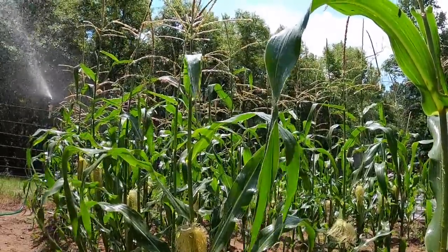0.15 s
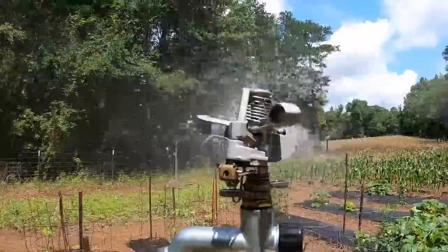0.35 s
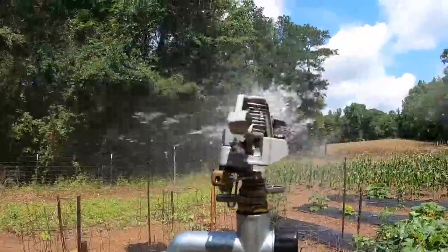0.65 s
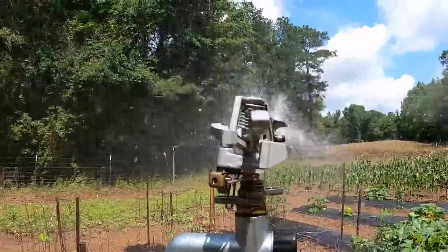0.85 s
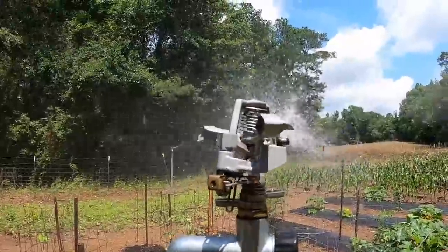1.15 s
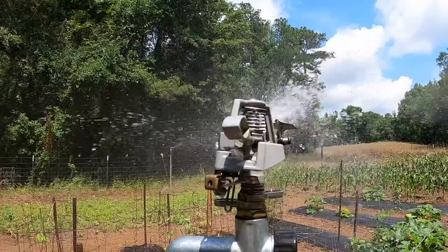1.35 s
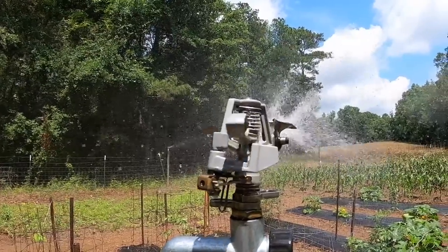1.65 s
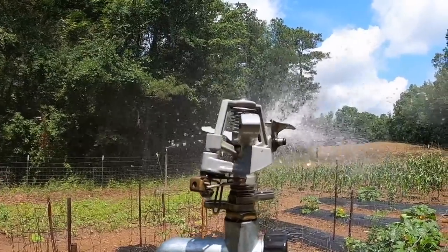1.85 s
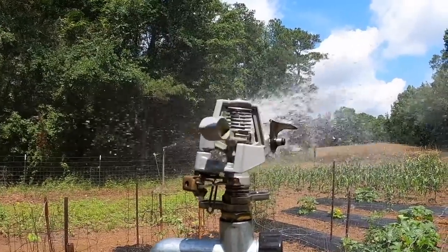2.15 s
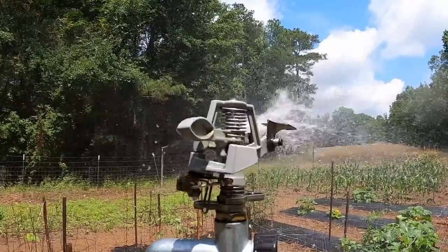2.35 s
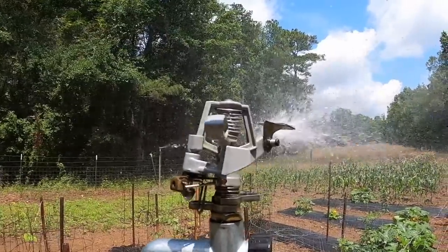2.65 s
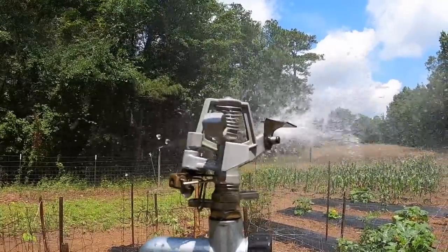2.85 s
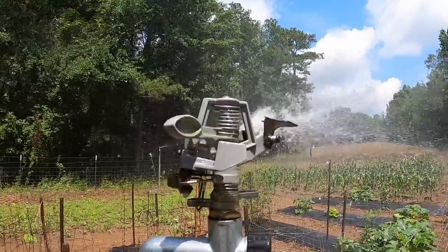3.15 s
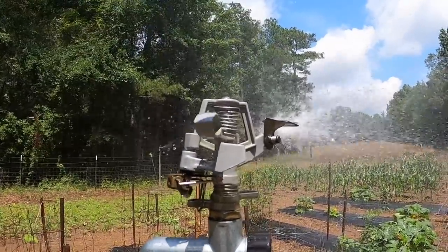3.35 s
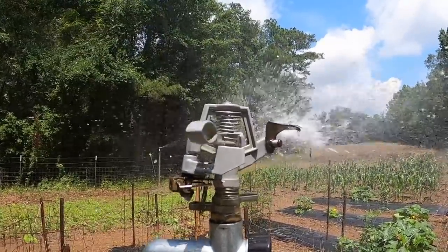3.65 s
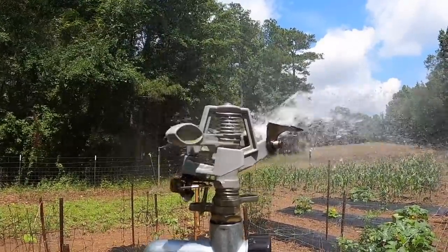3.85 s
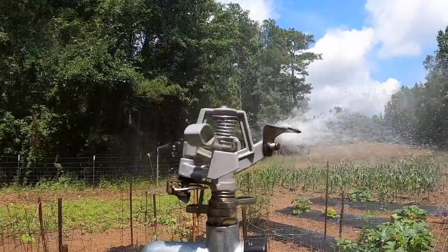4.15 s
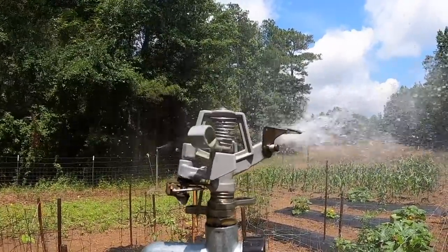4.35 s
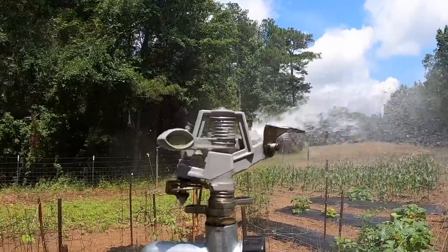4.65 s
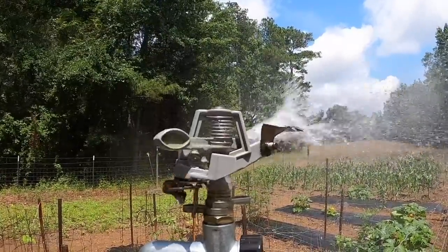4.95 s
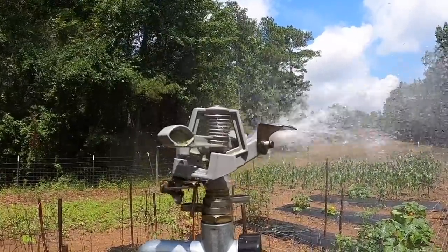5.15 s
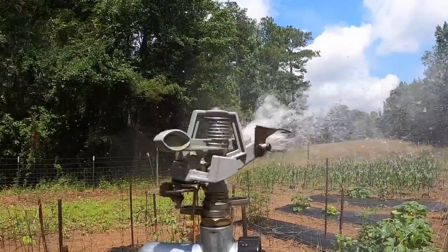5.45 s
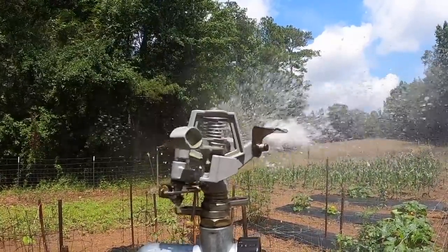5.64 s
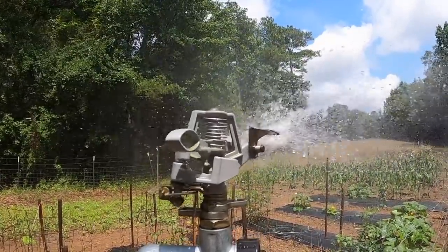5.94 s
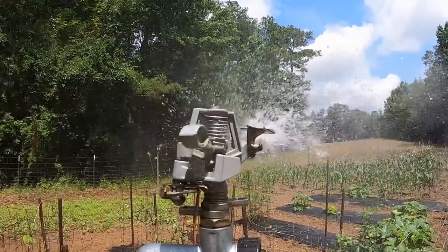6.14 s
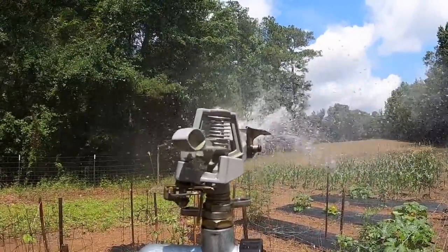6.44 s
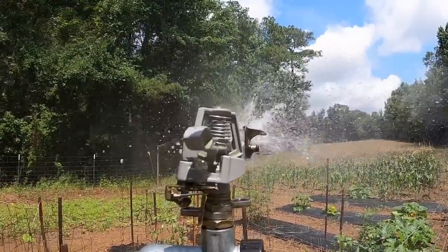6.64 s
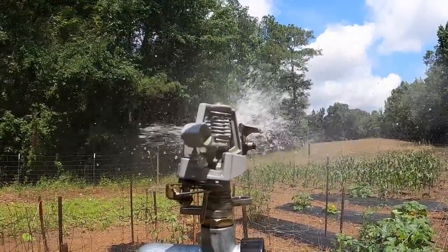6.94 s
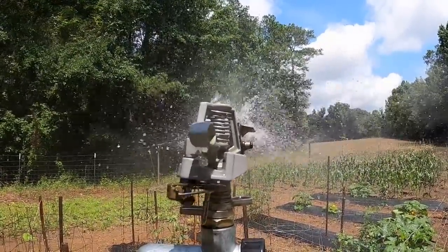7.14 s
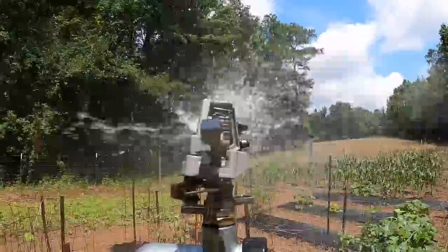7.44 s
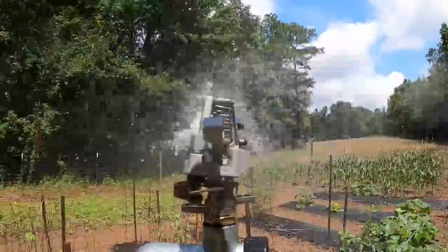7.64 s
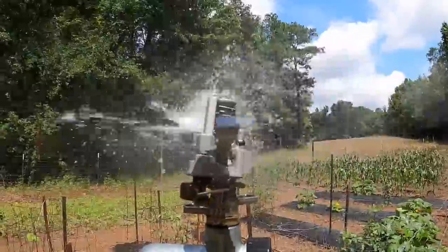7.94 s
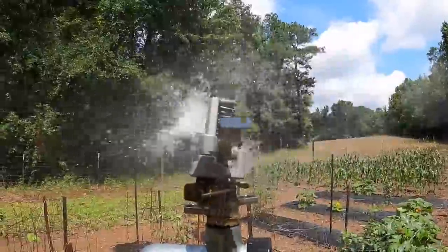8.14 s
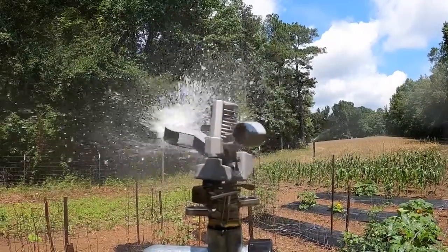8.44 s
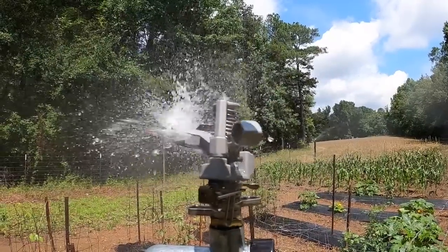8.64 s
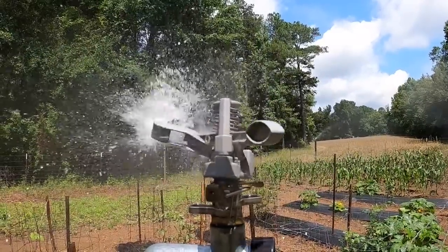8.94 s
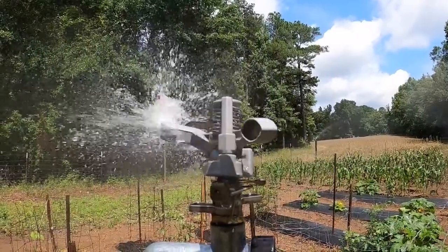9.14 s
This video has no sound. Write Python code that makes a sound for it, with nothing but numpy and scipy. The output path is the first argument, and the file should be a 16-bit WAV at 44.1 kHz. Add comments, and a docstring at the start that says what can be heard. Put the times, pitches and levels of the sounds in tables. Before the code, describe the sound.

From 0 to 0.25 s there is only a quiet, distant wash of falling water, low rumble and insect buzz. At about 0.26 s it cuts to a large impact sprinkler, very near. Its metal arm strikes evenly, almost nine times a second, each blow a crisp, high, short-ringing clink with a burst of torn water, fine spray and a faint low pipe thud. Between blows the jet hisses brightly and spits drops, thinning briefly as each stroke blocks it. The metallic body of the knocks grows fuller toward 3 to 5 s. At about 5 s the rhythm jumps to a fluttering fourteen strokes a second: louder, denser wet chops, with clinks far weaker. From 7 s onward the chatter stays rapid, gradually losing metal and finest spray, more splash-dominated by 9.3 s. Insects and falling water remain underneath. Dry open air, centred, close microphone.

```python
"""Garden: a large impact sprinkler, far off at first, close from its first swing at 0.26 s.
Jet, falling water, rumble and insects in the trees are spectrally shaped noise; the jet also spits drops.
The sprung arm swings its spoon into the jet: noise and drops splash, the pipe thuds, struck modes ring.
After 5 s the arm flutters faster and its high clink is weaker. All is centred but a faint low flicker."""
import sys
import numpy as np
from scipy import signal
from scipy.fft import rfft, irfft, next_fast_len
from scipy.io import wavfile
from scipy.ndimage import uniform_filter1d, map_coordinates

SR = 44100
rng = np.random.default_rng(int(sys.argv[2]) if len(sys.argv) > 2 else 0)


def store_wav(level_fs):
    """Save 16-bit WAV to argv[1]."""
    pcm = np.round(np.clip(np.atleast_2d(level_fs), -1, 1) * 32767)
    wavfile.write(sys.argv[1], SR, pcm.T.astype(np.int16))


N = 409688

# steady sounds: t/s, gain/dB of rumble, falling water, insects, jet; jet treble over the rest/dB
STEADY_GAINS = [(0, -30, -32.5, -35, -41, -8), (.26, -34.5, -35.5, -35.5, -44, -11),
                (.28, -35.5, -38, -36, -28.5, 3), (1.4, -37, -39, -39, -31, 0),
                (1.8, -36.5, -36.5, -37, -29, -1), (4.7, -38.5, -37.5, -34.5, -28, -2),
                (5.3, -37, -33.5, -28.5, -23.5, -1), (6.7, -35.5, -33, -31, -24.5, -3),
                (7, -36.5, -34.5, -31.5, -25.5, -1), (9.29, -33.5, -32.5, -28.5, -26, -4)]
# noise colours: f/Hz, density/dB per Hz
RUMBLE_SPECTRUM = [(12, -34), (20, -5), (75, -1.5), (116, -2.5), (228, -13.5), (400, -26), (520, -47),
                   (880, -120)]
FALL_SPECTRUM = [(150, -20), (250, -2.5), (600, -3), (720, -3), (790, -0.5), (860, -3.5), (1500, -3),
                 (3000, -3), (4600, -5.5), (6200, -16.5)]
INSECT_SPECTRUM = [(2600, -25.5), (3300, -3), (3900, -3.5), (5000, -8.5), (5400, -11.5)]
JET_SPECTRUM = [(3000, -37), (5500, -14.5), (7000, -10.5), (8500, -3), (11000, -1.5), (14000, 2),
                (16500, -1)]
FLICKER_SPECTRUM = [(15, -30), (40, -9), (150, -6), (400, -9), (900, -13), (1500, -26), (2500, -43)]
SPLASH_SPECTRUM = [(700, -21.5), (1500, -14), (2500, -9.5), (3500, -5), (5000, -0.5), (7000, 0.5),
                   (8500, 0.5), (10000, -3), (13000, -23)]
SPRAY_SPECTRUM = [(6000, -28), (8500, -4.5), (10000, -0.5), (12000, 0), (14000, -7.5), (16500, -5)]
SLAP_SPECTRUM = [(200, -22), (500, -7), (1500, 1.5), (3000, 1.5), (5000, -26)]
# swings of the arm into the jet: blow t/s, splash gain/dB, clink of the two highest mode groups/dB
SWINGS = [(0.2625, -22.5, -19), (0.3785, -19.5, -14), (0.4937, -22.5, -10.0), (0.6061, -21, -15),
          (0.719, -24.5, -10.6), (0.8352, -23.5, -10.7), (0.9507, -22.5, -14.7), (1.0635, -23, -11.5),
          (1.179, -23, -10.4), (1.293, -24.4, -12), (1.409, -23.4, -12.2), (1.5225, -22.5, -14.4),
          (1.6356, -21, -11.8), (1.748, -21, -13.5), (1.8638, -21, -12.8), (1.9769, -22, -12),
          (2.0891, -23.0, -11), (2.2029, -23.5, -12.6), (2.3168, -23, -13), (2.4276, -21.5, -17),
          (2.5433, -22, -12.4), (2.6546, -23, -11.2), (2.7698, -20, -20), (2.8856, -21.5, -12),
          (3.0025, -23.5, -13), (3.1177, -23, -14.2), (3.2332, -24.5, -12), (3.3487, -21.5, -13.3),
          (3.4639, -21.5, -14), (3.5795, -23, -12), (3.6958, -23, -13), (3.81, -25, -13),
          (3.9225, -23.5, -17), (4.0351, -22.5, -13.6), (4.1488, -23.5, -14.0), (4.2628, -22.5, -14.6),
          (4.3778, -22, -15), (4.4921, -23.5, -11), (4.6077, -22, -17), (4.7233, -22, -16),
          (4.8377, -23, -15), (4.9537, -22, -17), (5.0333, -21.0, -29.9), (5.1064, -19.5, -31.4),
          (5.1795, -20, -26.7), (5.2486, -19.5, -25.5), (5.3189, -19.5, -19.9), (5.3906, -18.5, -27.8),
          (5.4646, -19.5, -24.3), (5.5349, -19, -21.8), (5.6082, -19, -26.7), (5.679, -17.5, -24.9),
          (5.7521, -18.5, -26.6), (5.8217, -19, -22.5), (5.8894, -19.5, -22.7), (5.9607, -19, -26.8),
          (6.0305, -19.5, -22.4), (6.1016, -19.5, -25.7), (6.1732, -18.5, -25.7), (6.2435, -19.5, -23.4),
          (6.3152, -19, -21.9), (6.3851, -20.5, -24.6), (6.4557, -18.5, -26.3), (6.5234, -18.0, -22.4),
          (6.5917, -18.5, -22.0), (6.6622, -19.5, -21.9), (6.7312, -19.0, -24.3), (6.7998, -18.1, -23.4),
          (6.868, -19.5, -26.5), (6.9389, -18.5, -18.1), (7.0123, -19.5, -23.7), (7.0835, -18.5, -23.9),
          (7.1552, -19.5, -18.2), (7.2222, -19, -26.7), (7.2932, -18.4, -20.3), (7.3622, -18.7, -21.4),
          (7.4324, -18.5, -27.3), (7.5067, -18.0, -24.8), (7.5763, -18.4, -27.7), (7.6484, -19, -24.7),
          (7.7194, -18.5, -24.1), (7.7897, -19, -23.0), (7.8617, -18.5, -26.4), (7.9336, -17.5, -25.9),
          (8.008, -18, -28.2), (8.0786, -18.5, -27.6), (8.1495, -18, -23.4), (8.2197, -19, -24.4),
          (8.2887, -19, -25.2), (8.3571, -17.5, -26.8), (8.4267, -18.5, -28.6), (8.4954, -17.5, -31),
          (8.5687, -18, -29.4), (8.6411, -17.5, -27.9), (8.7117, -17, -29.3), (8.7832, -17.5, -26.0),
          (8.8546, -17.5, -33.3), (8.9236, -18, -30.2), (8.994, -17.5, -30.8), (9.0659, -17, -32.8),
          (9.1374, -18, -32.3), (9.211, -17, -32.5), (9.282, -18, -34)]
# turning head: t/s, fine spray over splash/dB, top mode over the next/dB,
# level/dB of the four lower mode groups, highest first
HEAD_TURN = [(.26, 1, -3, -21, -17, -28, -19), (1.2, -0.5, -7, -20, -20, -21.5, -21),
             (2, -1, -2, -20, -17, -16.5, -19), (3.1, -3, 4, -14.5, -15, -16, -16.5),
             (3.9, -4, 1, -15, -14, -14, -19), (4.97, -2, -2, -15.5, -11.5, -15.5, -18.5),
             (5.01, -4, 4, -31, -33, -29, -38), (6.4, -1, 5, -28, -39, -28, -28),
             (7.4, -0.5, -1, -31, -28, -37, -33), (8.3, -2.5, 1, -33, -30, -40, -35),
             (9.29, -13, 0, -40, -37, -38, -42)]
# splash whistling in the spoon as the nozzle comes round: t/s, band lift/dB
CUP_LIFT = [(0, -1.5), (5, 1), (7, 0.5), (9.29, 3.5)]
# riser pipe modes: f/Hz, level/dB, t60/s
PIPE_MODES = [(72, 0, .085), (120, -3, .04)]
# pipe thud: t/s, level/dB
THUD_LEVEL = [(0, -34), (.5, -42), (2.2, -41), (3.6, -41), (4.6, -45), (5.6, -43), (6.5, -38), (7.5, -41),
              (8, -36.5), (8.6, -39), (9.29, -36)]
# frame and arm modes: f/Hz, level within the group/dB, t60/s
FRAME_MODES = [(784, -24.5, .03), (1302, -17, 0.036), (1733, -13, 0.023), (2680, -8.5, 0.045),
               (3083, -6, 0.052), (3576, -2.5, 0.03), (3924, -4.5, 0.029), (4570, -3.5, 0.019),
               (5786, 2, 0.034), (7190, -2.5, 0.042), (7740, 0.5, 0.031), (8880, -12, .025),
               (9650, -17, 0.022), (10830, -6.5, 0.035), (11970, 7.5, 0.017), (13312, 5, 0.034),
               (14420, 5.5, 0.036)]
# borders between the mode groups: f/Hz
GROUP_BORDERS_HZ = (4800, 6500, 11000, 12600, 13900)

FLUTTER_FROM_S = 5
# spoon enters this long before the blow, stays this long
SWING_LEAD_S, SWING_STAY_S = 0.0012, .03
FLUTTER_LEAD_S, FLUTTER_STAY_S = 0.0045, .035
FLUTTER_SOFTER = 1.3  # factor on the rise and fall times
SPITS_PER_S, JET_SPIT_DB, SPLASH_SPIT_DB = 120, -9, -13
CUP_HZ, CUP_WIDTH_HZ = 7080, 770
BALANCE_SCATTER_DB, BODY_SCATTER_DB, SPRAY_SCATTER_DB = 2, 1.5, 1  # swing to swing
THUD_WAVER_DB = 2.5
TOP_HZ = 15750


def amp(db):
    """Gain of a level in dB."""
    return 10 ** (np.asarray(db) / 20)


def unit(x):
    """x at rms 1."""
    return x / np.sqrt(np.mean(x ** 2) + 1e-20)


def along(points, hz):
    """(f/Hz, value) points interpolated on a log frequency axis."""
    f, value = np.transpose(points)
    return np.interp(np.log(hz + 1), np.log(f + 1), value)


def filtered(x, response):
    """x times a gain that depends on frequency, by zero-padded FFT."""
    size = next_fast_len(N + 8192)
    gain = response(np.fft.rfftfreq(size, 1 / SR))
    return irfft(rfft(x, size) * gain, size)[..., :N]


def coloured(x, spectrum):
    """x shaped by a spectrum table, at rms 1."""
    return unit(filtered(x, lambda hz: amp(along(spectrum, hz))))


def wobble(knots_per_s):
    """Smooth random curve through normally distributed knots."""
    knots = rng.standard_normal(int(N * knots_per_s / SR) + 4)
    return map_coordinates(knots, [np.arange(N) * knots_per_s / SR])


def curves(rows):
    """One value per sample for each column after the time."""
    s, *columns = np.transpose(rows)
    return [np.interp(np.arange(N) / SR, s, column) for column in columns]


def turn():
    """Columns of the head's turn at each swing."""
    s, *columns = np.transpose(HEAD_TURN)
    blows_s = np.transpose(SWINGS)[0]
    return np.array([np.interp(blows_s, s, column) for column in columns])


def rush(spectrum, spit_db, spit_rate, patchy_db):
    """Coloured noise at rms 1, bunched into short spits and patches of time and pitch."""
    noise = rng.standard_normal(N) * amp(spit_db * wobble(spit_rate))
    z = signal.stft(noise, nperseg=256)[2]
    field = uniform_filter1d(rng.standard_normal(z.shape), size=5, axis=0)
    field = uniform_filter1d(field, size=4, axis=1)
    patchy = signal.istft(z * amp(patchy_db * unit(field)), nperseg=256)[1][:N]
    return coloured(patchy, spectrum)


def drops(rate, hz, spread, cycles, size_db, spectrum):
    """Bursting drops at rms 1: short damped sines of scattered pitch and size."""
    when, pitch, size = rng.random((3, round(rate * 10), 1))  # rate per s, over 10 s
    f = np.clip(hz * np.exp(spread * (2 * pitch - 1)), 500, 15500)
    t = np.arange(96) / SR
    level = amp(-size_db * np.log(size + .03))
    grain = level * np.sin(2 * np.pi * f * t) * np.exp(-t * f / cycles)
    where = (when * SR * 10).astype(int) + np.arange(len(t))
    patter = np.bincount(where.ravel(), grain.ravel(), SR * 11)[:N]
    return coloured(patter, spectrum)


def crossing(gains, lead, rise, fall, sag_db=0):
    """Envelope open while the spoon is in the jet, one gain per crossing; times in s."""
    env = np.zeros(N + SR)
    for (s, *_), gain in zip(SWINGS, gains):
        flutter = s > FLUTTER_FROM_S
        early, stay = (FLUTTER_LEAD_S, FLUTTER_STAY_S) if flutter else (SWING_LEAD_S, SWING_STAY_S)
        soft = FLUTTER_SOFTER if flutter else 1
        t = np.arange(SR // 10) / SR - .03 + early  # 0 as the spoon enters
        opening = 1 / (1 + np.exp((-lead - t) / (rise * soft)))
        closing = 1 / (1 + np.exp((t - stay) / (fall * soft)))
        start = round((s - .03) * SR)
        env[start:start + len(t)] += gain * opening * closing * amp(sag_db * t / stay)
    return env[:N]


def rumble(blocked):
    """Distant rumble: low noise, dipping at each crossing."""
    gain_db = curves(STEADY_GAINS)[0] - 3.0 * blocked
    return amp(gain_db) * rush(RUMBLE_SPECTRUM, spit_db=.5, spit_rate=15, patchy_db=1.5)


def falling_water(blocked):
    """Jet's falling water: noise that thins while the nozzle is blocked."""
    gain_db = curves(STEADY_GAINS)[1] - 3.1 * blocked
    return amp(gain_db) * rush(FALL_SPECTRUM, spit_db=1.5, spit_rate=300, patchy_db=1.5)


def insects():
    """Insects buzzing in the trees: band noise wavering at two speeds."""
    gain_db = curves(STEADY_GAINS)[2] + 1.3 * wobble(3) + 1.0 * wobble(14)
    return amp(gain_db) * rush(INSECT_SPECTRUM, spit_db=2.0, spit_rate=160, patchy_db=1.5)


def free_jet(blocked, tilt_db):
    """Jet tearing into hiss, drops and sparse sharp spits; it thins while the nozzle is blocked."""
    jet_db = curves(STEADY_GAINS)[3]
    jet = rush(JET_SPECTRUM, spit_db=0, spit_rate=520, patchy_db=1.5)
    jet = jet + amp(-2) * drops(1000, 9500, .55, 2.2, size_db=3, spectrum=JET_SPECTRUM)
    spits = drops(SPITS_PER_S, 8600, 0.47, 0.69, size_db=4.5, spectrum=JET_SPECTRUM)
    jet = jet + amp(JET_SPIT_DB) * spits
    # brighter when the nozzle faces the listener
    top = filtered(jet, lambda hz: 1 / (1 + (11500 / (hz + 1)) ** 6))
    jet = amp(-tilt_db / 2) * (jet - top) + amp(tilt_db / 2) * top
    return amp(jet_db - 6.5 * blocked + 0.66 * wobble(35)) * jet


def bed():
    """Steady sounds, with the spoon blocking the nozzle at each crossing."""
    tilt_db = curves(STEADY_GAINS)[4] + 2 * wobble(4)
    blocked = crossing(np.ones(len(SWINGS)), 0, 0.0037, 0.0062)
    return rumble(blocked) + falling_water(blocked) + insects() + free_jet(blocked, tilt_db)


def flicker():
    """Faint low noise of uneven level, following the falling water's gain curve."""
    gain_db = curves(STEADY_GAINS)[1] - 29.5 + 9 * wobble(10)
    return amp(gain_db) * rush(FLICKER_SPECTRUM, spit_db=1, spit_rate=20, patchy_db=8)


def coarse_splash(splash_db):
    """Jet torn by the spoon into noise, drops and spits, whistling in the spoon's band."""
    spatter = amp(-2) * drops(1500, 7000, .6, 1.6, size_db=3, spectrum=SPLASH_SPECTRUM)
    hiss = rush(SPLASH_SPECTRUM, spit_db=1.5, spit_rate=830, patchy_db=0.5)
    coarse = crossing(amp(splash_db), 0, 0.0026, 0.0037, sag_db=-3) * (hiss + spatter)
    spits = drops(SPITS_PER_S, 7100, 0.42, 0.96, size_db=4.5, spectrum=SPLASH_SPECTRUM)
    coarse = coarse + amp(SPLASH_SPIT_DB) * crossing(amp(splash_db), 0, 0.0027, 0.0034) * spits
    cupped = filtered(coarse, lambda hz: np.exp(-((hz - CUP_HZ) / CUP_WIDTH_HZ) ** 2))
    return coarse + (amp(curves(CUP_LIFT)[0]) - 1) * cupped


def fine_spray(spray_db):
    """Fine high spray torn off by the spoon: treble noise, one level per crossing."""
    env = crossing(amp(spray_db), 0.0028, 0.0031, 0.0013, sag_db=-1.5)
    return env * rush(SPRAY_SPECTRUM, spit_db=2.5, spit_rate=970, patchy_db=0.5)


def mist(splash_db):
    """Torn water pattering down after each crossing: noise under a decaying tail."""
    settling = amp(-60 * np.arange(SR // 4) / SR / 0.38)  # t60 0.38 s
    env = signal.fftconvolve(crossing(amp(splash_db), 0, .003, .003), settling / settling.sum())[:N]
    return amp(-10.5) * env * rush(SPLASH_SPECTRUM, spit_db=3, spit_rate=490, patchy_db=2)


def slaps(splash_db):
    """Spoon slapping the water going in and out: noise on the slopes of the crossing."""
    edges = np.abs(np.gradient(crossing(amp(splash_db), 0.0052, 0.0043, 0.0029)))
    return amp(38.0) * edges * rush(SLAP_SPECTRUM, spit_db=0, spit_rate=400, patchy_db=2.5)


def splashes():
    """All the water sounds of the crossings; the spray's share follows the head's turn."""
    splash_db = np.transpose(SWINGS)[1]
    spray_db = splash_db + turn()[0] + SPRAY_SCATTER_DB * rng.standard_normal(len(splash_db))
    return coarse_splash(splash_db) + fine_spray(spray_db) + mist(splash_db) + slaps(splash_db)


def thuds():
    """Pipe pushed one way as the jet is cut, the other as it is freed: pulses into damped modes."""
    push, t = np.zeros(N + SR), np.arange(SR // 6) / SR
    scatter_db = rng.normal(0, 1.4, (len(SWINGS), 2))
    for (s, *_), (cut_db, freed_db) in zip(SWINGS, scatter_db):
        # from the blow, s
        cut_s, freed_s = (-.0125, .0355) if s > FLUTTER_FROM_S else (-.0035, .036)
        push[round((s + cut_s) * SR)] = amp(-4 + cut_db)
        push[round((s + freed_s) * SR)] = -amp(freed_db)
    ring = sum(amp(db - 60 * t / t60) * np.sin(2 * np.pi * hz * t) for hz, db, t60 in PIPE_MODES)
    ring = ring * (1 - np.exp(-t / .003))
    level_db = curves(THUD_LEVEL)[0] + THUD_WAVER_DB * wobble(3.03)
    return amp(level_db) * unit(signal.fftconvolve(push, ring)[:N])


def knocks():
    """Arm striking the frame: damped modes at new strengths each blow, over a short noise crack."""
    out, t = np.zeros(N + SR), np.arange(SR // 10) / SR
    hz, mode_db, t60 = np.transpose(FRAME_MODES)[:, :, None]
    mode_scatter = rng.standard_normal((len(SWINGS), 3, len(FRAME_MODES), 1))
    group_scatter = rng.standard_normal((len(SWINGS), 5))
    for swing, turned, modes, groups in zip(SWINGS, turn().T, mode_scatter, group_scatter):
        s, _, clink_db = swing
        _, tip_db, *body_db = turned
        size, phase, detune = modes
        tip, *body = groups
        half_tip_db = (tip_db + BALANCE_SCATTER_DB * tip) / 2
        body_db = body_db + BODY_SCATTER_DB * np.array(body)
        group_db = np.r_[clink_db + half_tip_db, clink_db - half_tip_db, body_db]  # highest first
        level_db = group_db[::-1][np.digitize(hz, GROUP_BORDERS_HZ)] + mode_db
        level_db = level_db + 2 * size * (mode_db < 0)  # only modes below 0 dB scatter singly
        angle = 2 * np.pi * hz * (1 + .0015 * detune) * t + 1.5 * phase
        ring = amp(level_db - 60 * t / t60) * np.sin(angle)
        crack_noise = np.diff(rng.standard_normal(len(t) + 1))
        crack = amp(np.mean(group_db) + 8.0 - 60 * t / 0.018) * crack_noise
        onset = 1 - np.exp(-t / 0.00034)
        out[round(s * SR):][:len(t)] += (ring.sum(axis=0) + crack) * onset
    return out[:N]


def scene():
    """Centred sum of all sources; the flicker enters left and right in opposite sign."""
    mid = splashes() + knocks() + thuds() + bed()
    side = flicker()
    return np.array([mid + side, mid - side])


def record(dry):
    """Soft clipping towards 1.1, then a sharp low-pass."""
    clipped = dry / (1 + np.abs(dry / 1.1) ** 6) ** (1 / 6)
    return filtered(clipped, lambda hz: hz < TOP_HZ)


dry = scene()
out = record(dry)
store_wav(out)
```